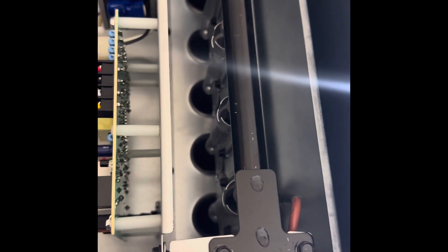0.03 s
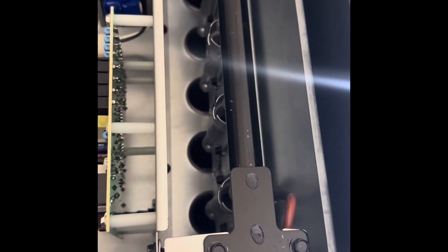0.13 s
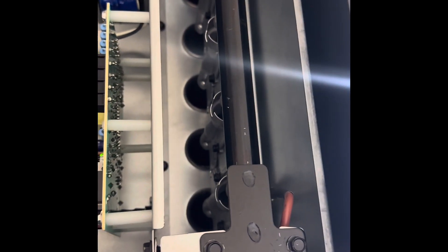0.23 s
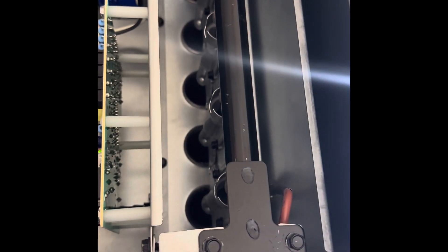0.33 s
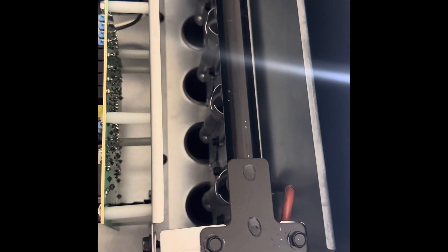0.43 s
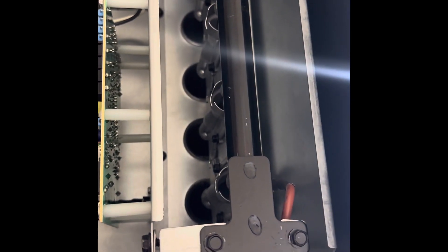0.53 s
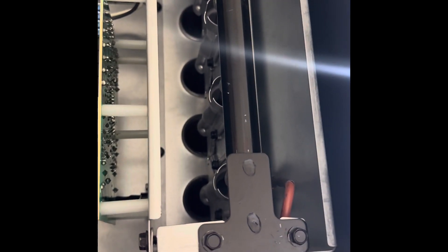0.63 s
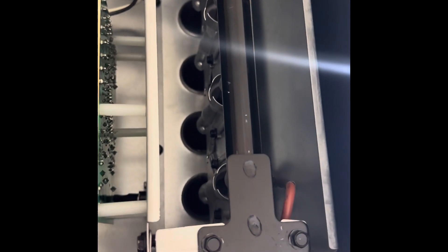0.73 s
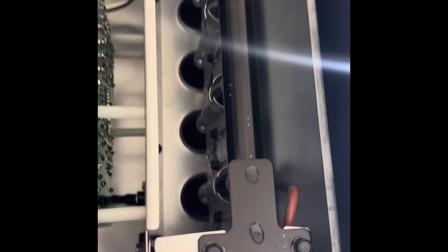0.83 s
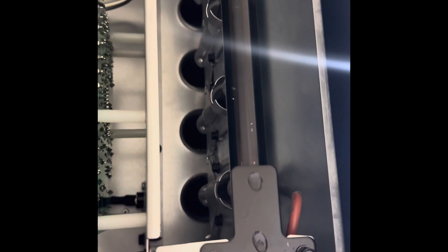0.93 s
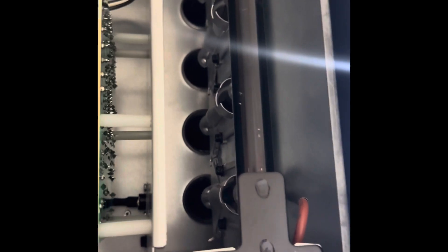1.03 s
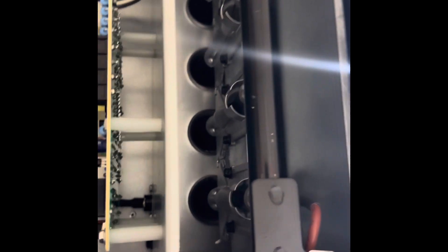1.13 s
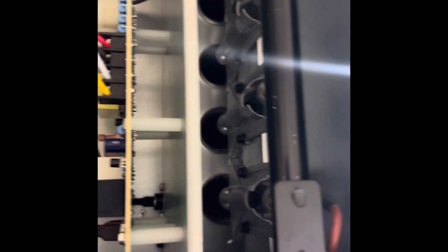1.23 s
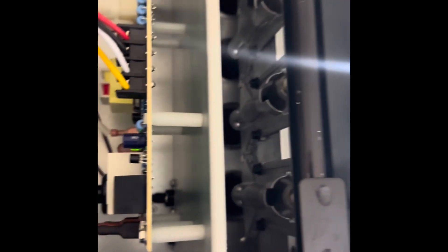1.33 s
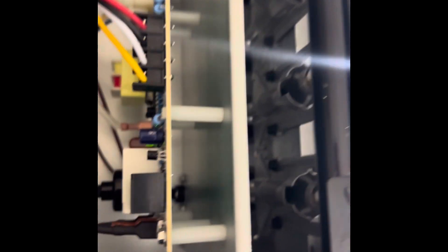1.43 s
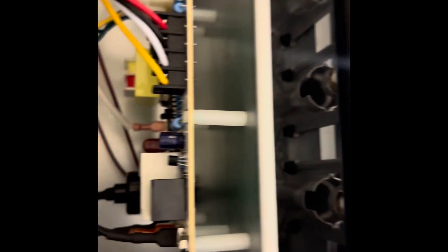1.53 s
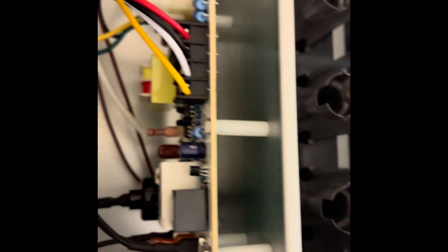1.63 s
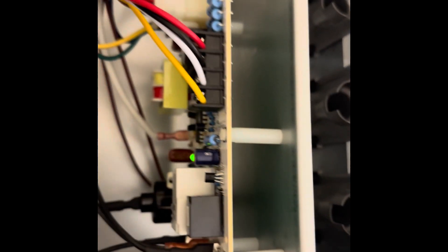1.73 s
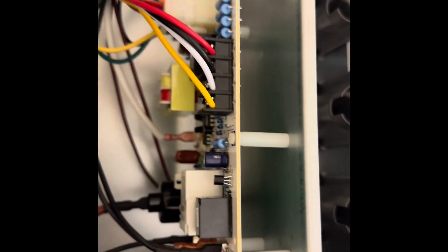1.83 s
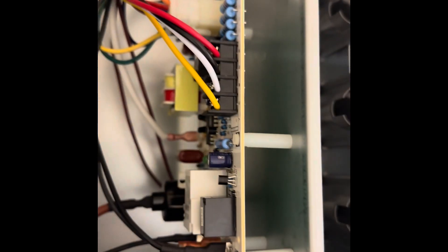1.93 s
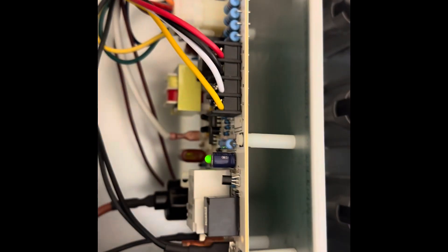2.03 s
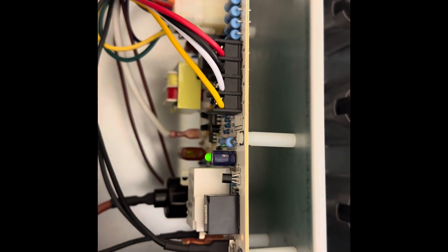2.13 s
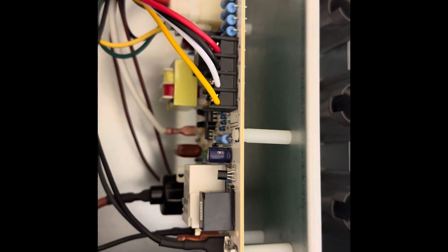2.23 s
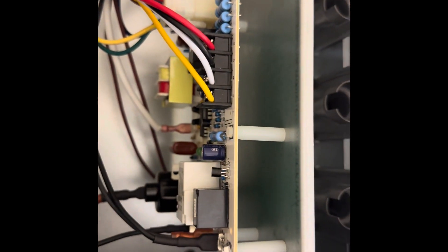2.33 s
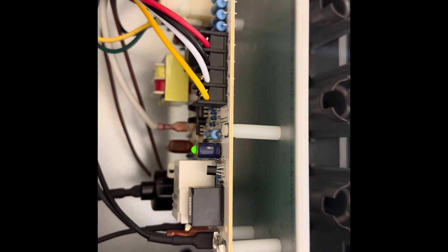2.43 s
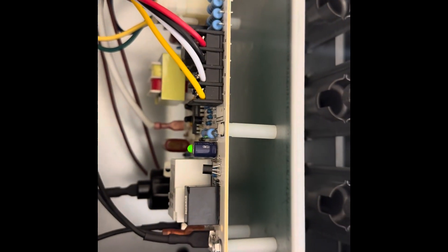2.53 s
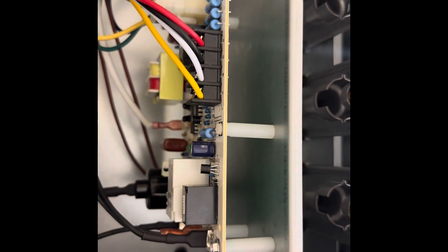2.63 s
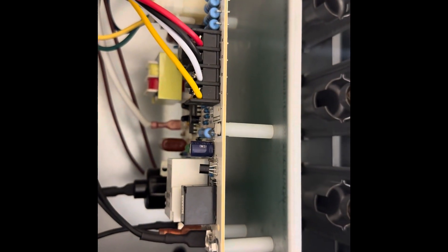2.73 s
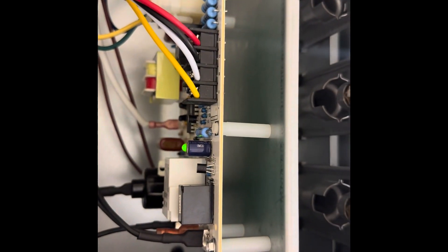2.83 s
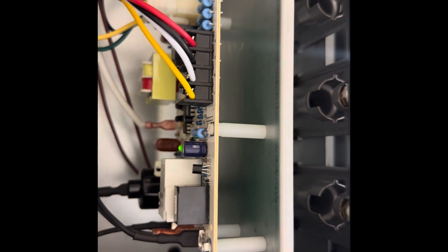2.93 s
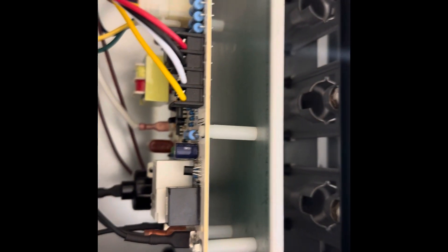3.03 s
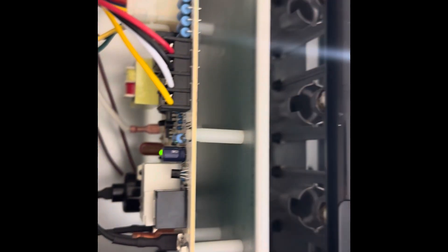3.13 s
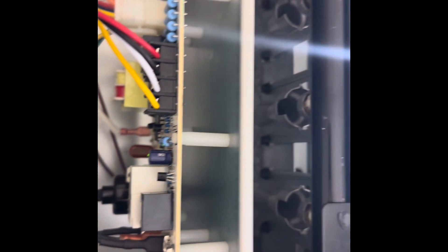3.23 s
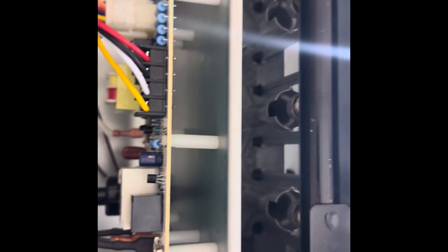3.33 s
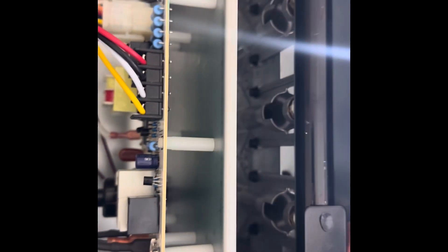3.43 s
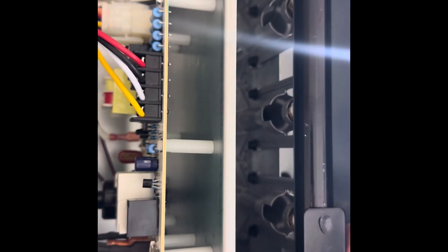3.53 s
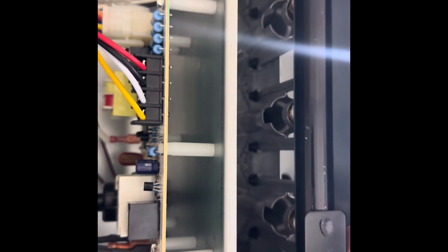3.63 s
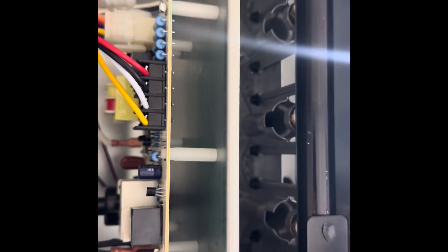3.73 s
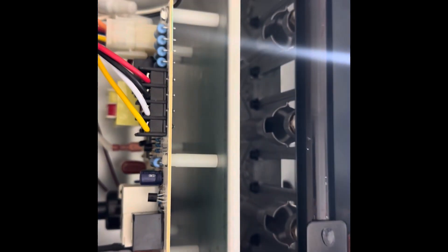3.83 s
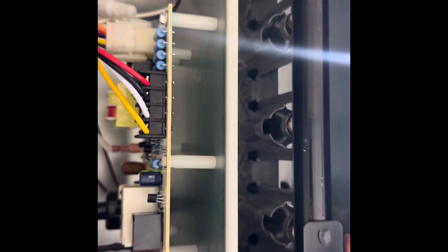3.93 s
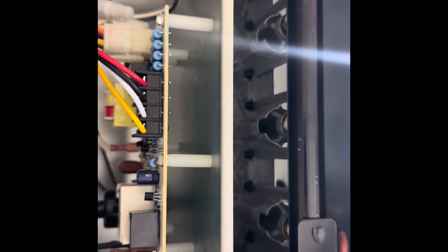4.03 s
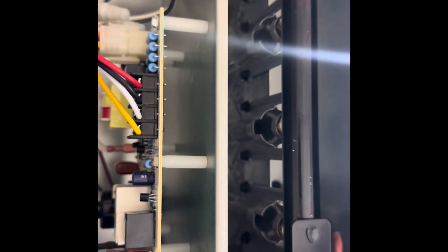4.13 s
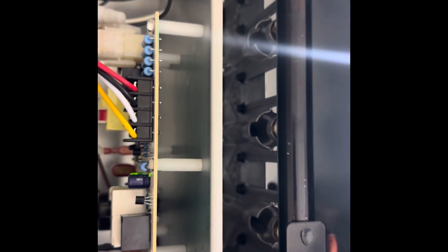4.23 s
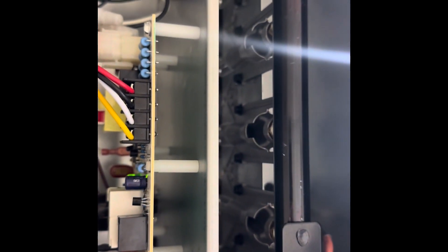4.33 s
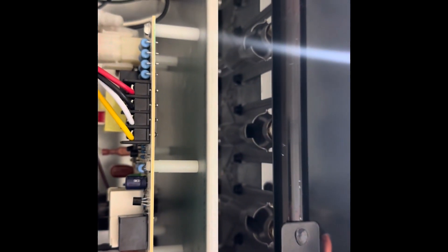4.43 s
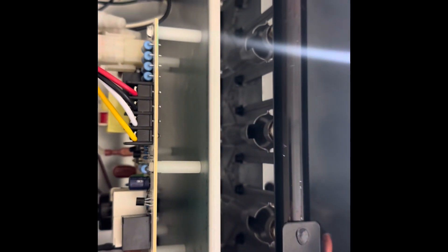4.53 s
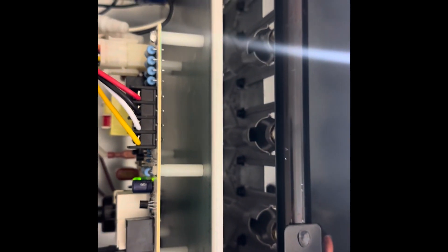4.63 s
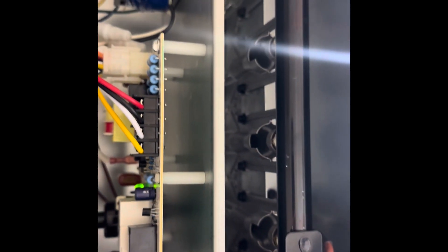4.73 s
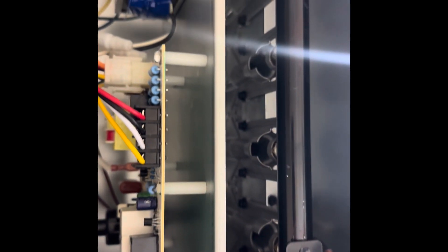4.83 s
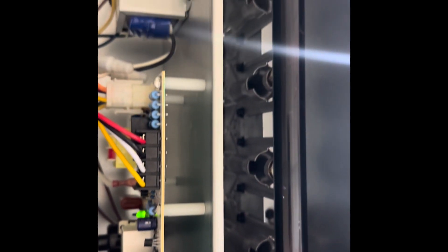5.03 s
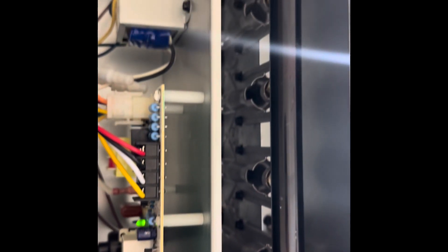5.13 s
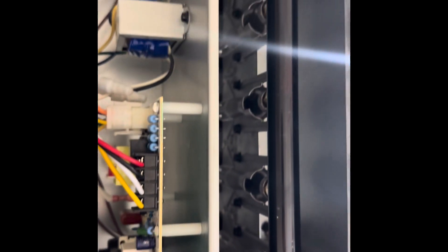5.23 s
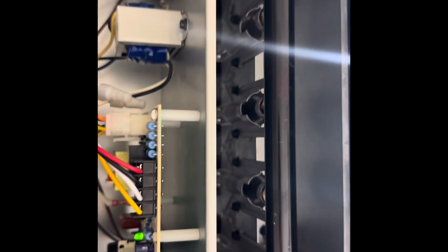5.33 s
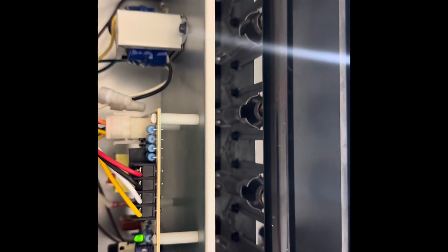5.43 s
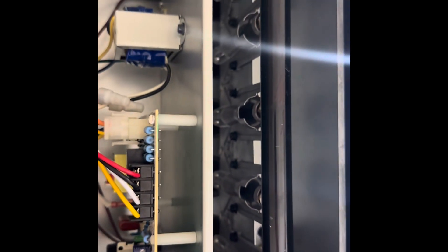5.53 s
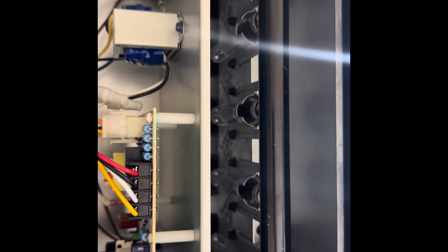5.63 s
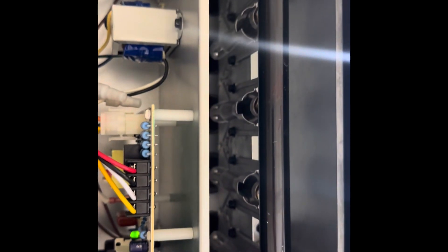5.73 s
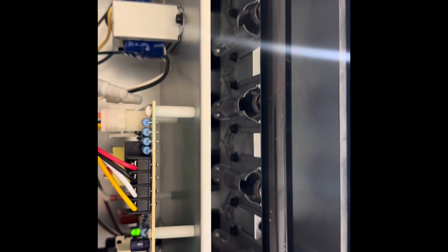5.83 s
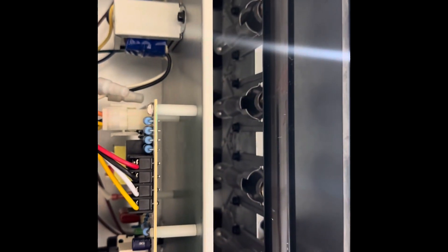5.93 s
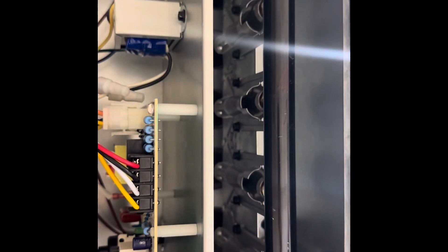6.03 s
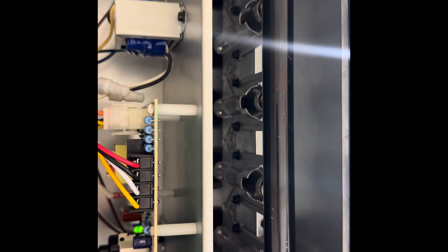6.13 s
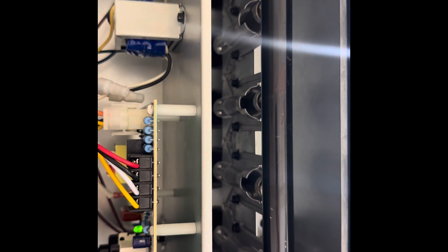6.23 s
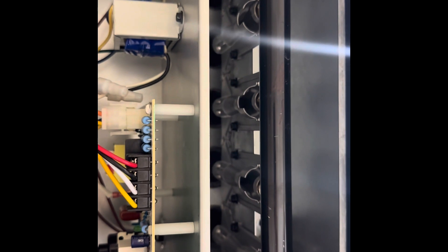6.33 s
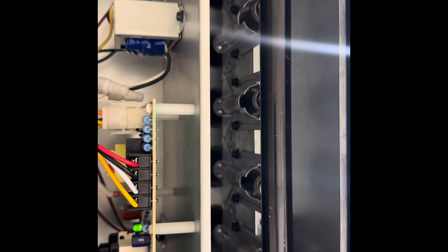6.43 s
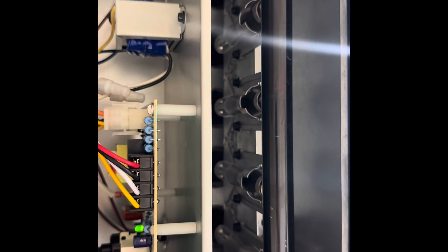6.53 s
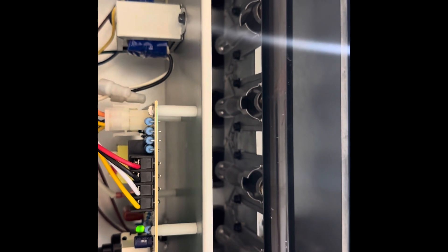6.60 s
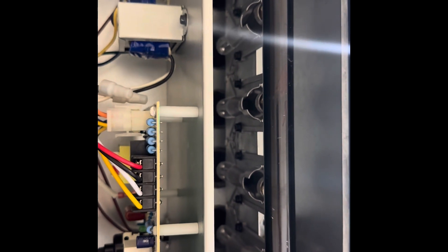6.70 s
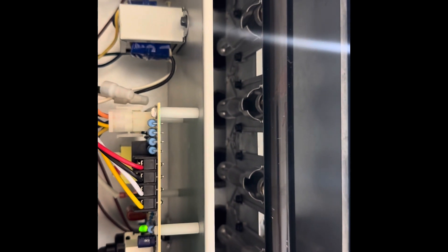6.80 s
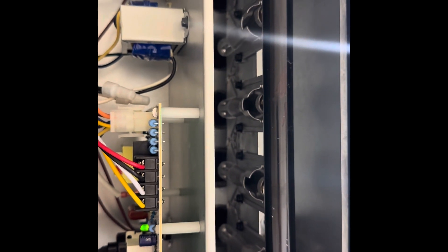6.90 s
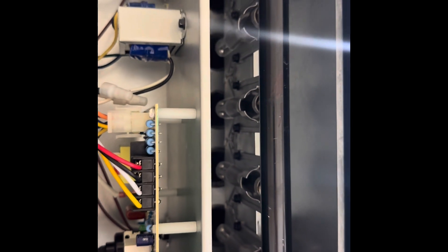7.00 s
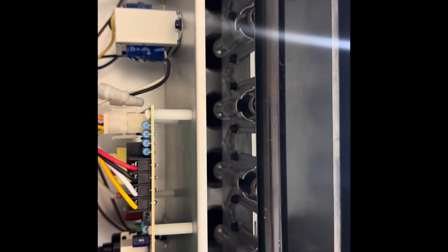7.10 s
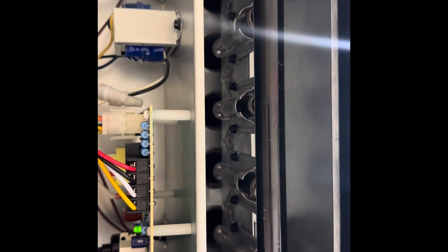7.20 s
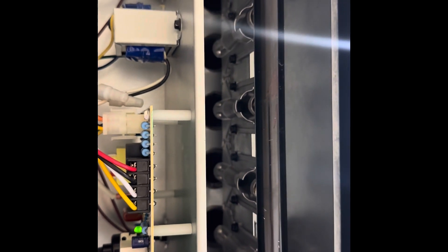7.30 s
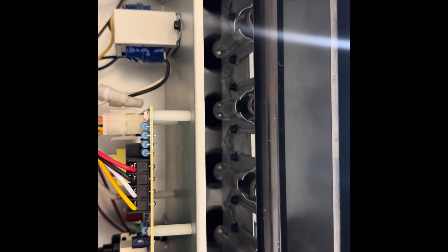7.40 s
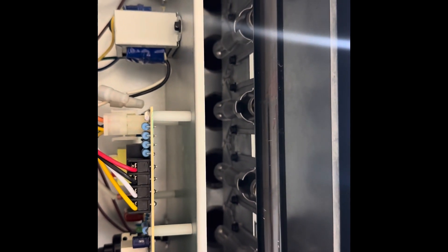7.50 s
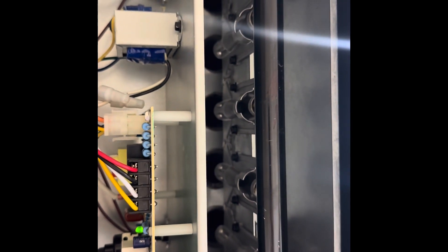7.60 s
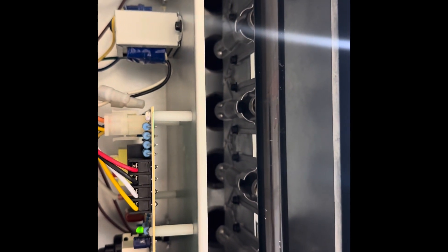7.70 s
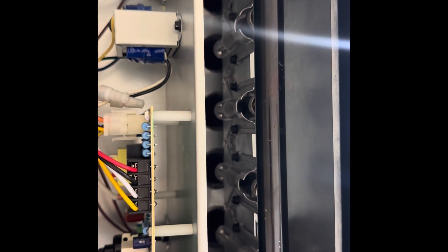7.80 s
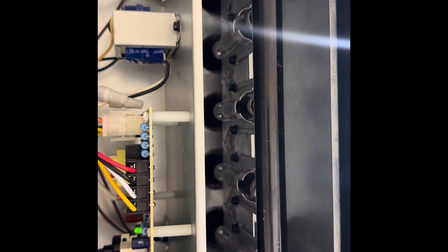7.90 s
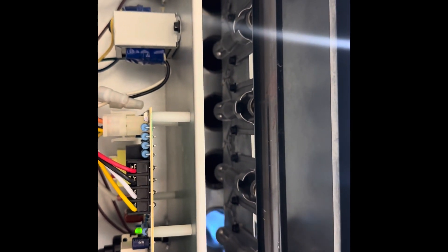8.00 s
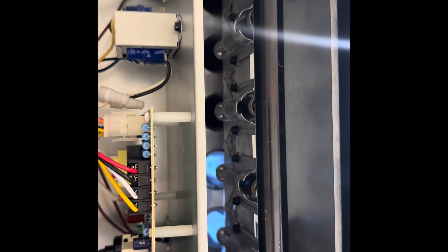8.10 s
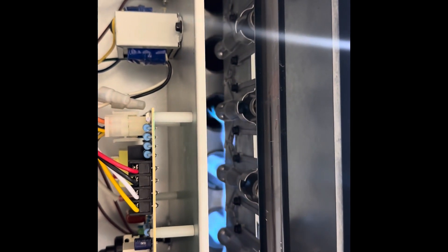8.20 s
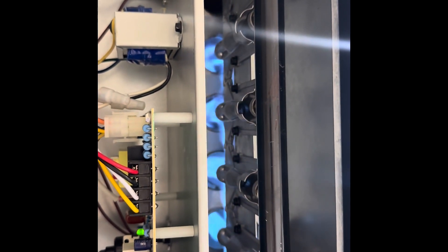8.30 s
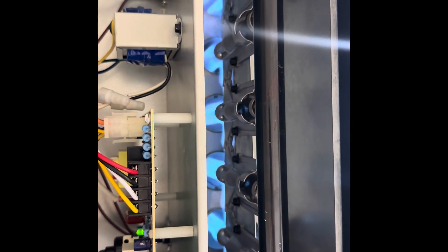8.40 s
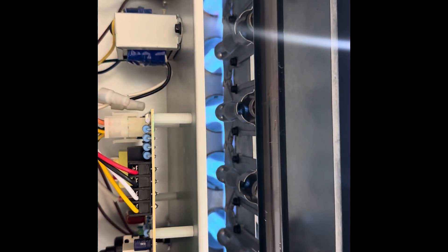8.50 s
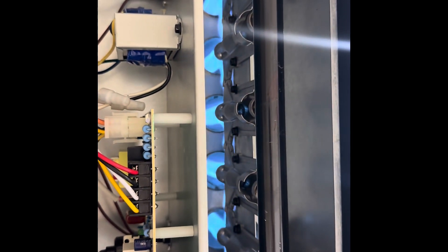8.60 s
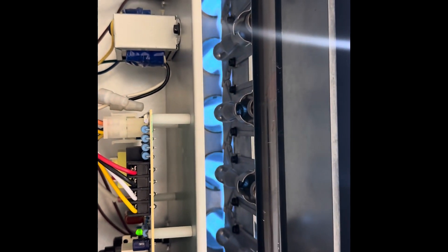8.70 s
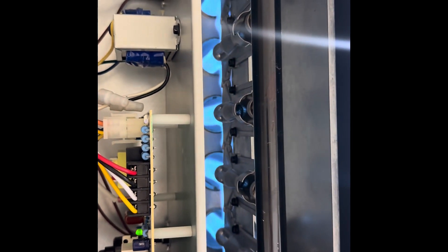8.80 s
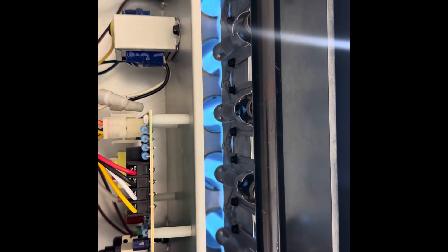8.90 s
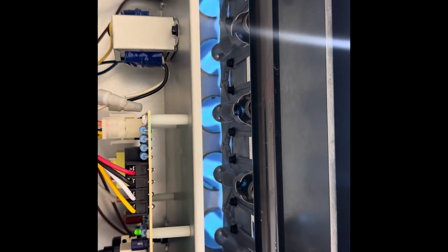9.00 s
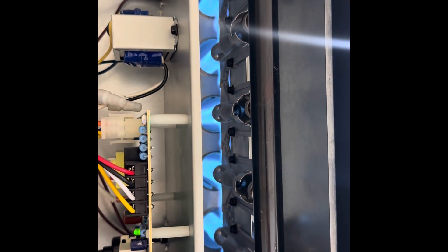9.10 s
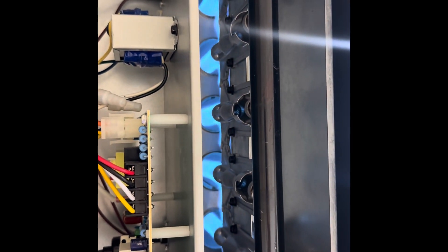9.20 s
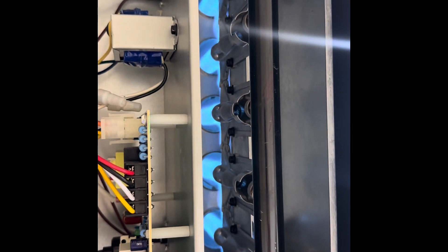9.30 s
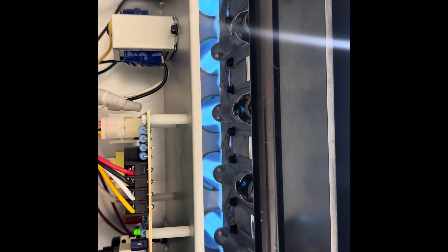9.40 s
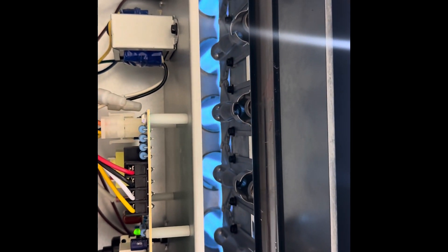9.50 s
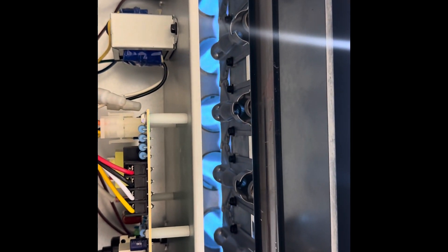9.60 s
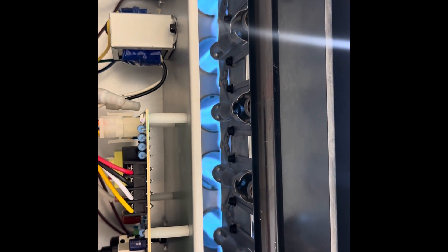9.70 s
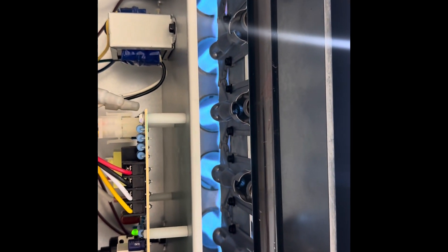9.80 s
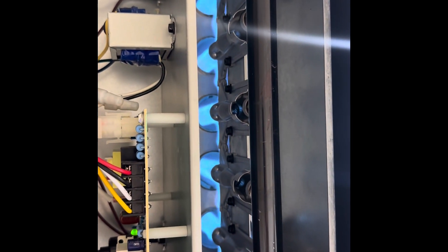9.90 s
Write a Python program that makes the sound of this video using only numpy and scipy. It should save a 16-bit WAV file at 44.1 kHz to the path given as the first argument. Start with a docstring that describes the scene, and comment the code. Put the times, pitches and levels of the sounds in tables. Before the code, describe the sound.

Very close to the open burner box of a gas unit heater, with narrow stereo width and little room sound. From 0 seconds a draught blower runs steadily: a deep electrical hum, slowly beating, with broad rushing air, a faint hollow moan and a fine high hiss. The hiss and moan shift subtly as the microphone moves along the cabinet during the first five seconds, with a thin whistle near 4. At about 6.15 the igniter starts abruptly, a harsh bright buzz of about sixty snaps per second ringing the metal box. At 7.1 the gas valve ticks and clacks in a tight metallic flurry, followed by a short low panel boom. Between about 7.95 and 8.4 burners catch one after another in soft, ragged puffs and low thumps. A low fluttering roar builds and continues to the end near 10, beneath rougher, shimmering spark buzz and the unchanged blower.

```python
"""Close by the open burner box of a gas unit heater, as it starts up.
The draught blower hums (steady tones) and rushes (coloured noise) throughout.
The igniter begins to spark once every mains cycle, each snap ringing the burner box.
The gas valve clacks open: short blows shake its body, and a cabinet panel booms.
The burners catch with soft puffs of shaped noise and low pushes, and settle into a low roar."""
import sys
import numpy as np
from scipy import signal
from scipy.fft import rfft, irfft, next_fast_len
from scipy.io import wavfile
from scipy.ndimage import uniform_filter1d, map_coordinates

SR = 44100
rng = np.random.default_rng(int(sys.argv[2]) if len(sys.argv) > 2 else 0)


def to_wav(s):
    """Save 16-bit WAV."""
    ch = np.atleast_2d(s).T  # columns
    pcm = np.round(np.clip(ch, -1, 1) * 32767)  # PCM
    wavfile.write(sys.argv[1], SR, pcm.astype(np.int16))


N = 438794
T = np.arange(N) / SR  # time of every sample, in seconds

# In all tables, spectrum levels are relative, and half-width is how far from its centre
# a resonance has dropped by 6 dB.

# Tones of the turning wheel: [multiple of shaft speed, level/dB, phase waver/turns]
WHEEL_TONES = [(1, -32, .005), (2, -41.5, 0.015), (7, -52.5, 0.052), (9, -53.5, .08), (10, -56, 0.08),
               (21, -57, 0.2), (28, -58.5, 0.13), (30, -59, 0.078)]
# Buzz of the motor frame: [multiple of mains frequency, level/dB, phase waver/turns]
FRAME_TONES = [(6, -46.5, 0.38), (8, -50.5, 0.2), (10, -51.5, 0.11), (12, -54, 0.26), (14, -53.5, 0.35),
               (21, -57, 0.17)]
# Spectrum of the rushing air: [f/Hz, level/dB]
RUSH_SPECTRUM = [(28, -20.5), (45, -8.5), (70, 7), (100, 0), (160, 2), (220, -0.5), (300, -6.5), (450, -10),
                 (800, -12.5), (1100, -13.5), (1600, -17.5), (2200, -18.5), (3000, -23), (4200, -26.5),
                 (5000, -34.5), (9000, -64)]
# Weaker air resonances of the housing and those of the tubes: [f/Hz, half-width/Hz, level/dB]
HOUSING_MODES = [(262, 16, -6.5), (479, 23, -13.5), (602, 45, -13.5), (728, 30, -16), (785, 31, -17),
                 (828, 24, -17), (959, 23, -15.5), (1070, 22, -20), (1227, 35, -23.5), (1440, 55, -21),
                 (1917, 62, -20), (2490, 43, -23.5), (2777, 210, -21.5), (3490, 126, -27),
                 (3850, 165, -26.5)]
# Main air resonance of the housing: [f/Hz, half-width/Hz, level/dB]
MOAN_MODE = [(364, 38, 0)]
# Spectrum of the hiss at the burner mouths: [f/Hz, level/dB]
HISS_SPECTRUM = [(3000, -28), (5000, -11.5), (5400, -2), (5900, -0.5), (6400, -2), (7300, 3), (8800, -5.5),
                 (9900, -10), (10500, -35), (11500, -57), (16000, -43)]
# Resonances in that hiss: [f/Hz, half-width/Hz, level/dB]
HISS_MODES = [(7080, 120, -2), (7120, 63, 2), (7760, 36, 4), (8330, 58, -1.5), (8840, 77, -0.5)]
# Thin whistle of one burner mouth: [f/Hz, half-width/Hz, level/dB]
WHISTLE_MODE = [(7340, 130, 0)]
# The microphone moves along the cabinet: [t/s, place 0-3]
MICROPHONE_PLACE = [(1.1, 0), (1.7, 1), (3.0, 1), (3.4, 2), (4.5, 2), (5.3, 3)]
# The hiss changes as the microphone nears the burner mouths: [t/s, level/dB]
HISS_LEVEL = [(0, -1), (1.0, -0.5), (1.55, 3), (2.8, 0), (4.1, 3), (5.1, 1), (6.1, 2)]
# The rush above the bass, along the microphone's way: [t/s, level/dB]
UPPER_RUSH_LEVEL = [(0, -0.5), (0.7, -0.5), (1.4, 0.5), (2.7, -0.1), (3.9, 1), (5.2, 0), (6.2, 1)]
# The moan along the microphone's way: [t/s, level/dB]
MOAN_LEVEL = [(0, 1.5), (.7, 0), (1.3, 1.5), (2.6, 2.5), (4.2, 1.2), (4.8, -1), (7.8, -0.5)]
# The valve's blows: [t/s, level/dB, weight from 0 (light tick) to 1 (heavy knock)]
VALVE_BLOWS = [(7.0904, -14, 0), (7.096, -3, 0.06), (7.0992, -3, 0.08), (7.103, -9, 0.2),
               (7.1092, -8.5, 0.23), (7.1106, -5, .1), (7.113, -3, 0.95), (7.117, -11.5, 0.9),
               (7.1207, -9, 0.5), (7.124, -8, 0.8), (7.132, -12, .9)]
# Spectrum of the light tick: [f/Hz, level/dB]
TICK_SPECTRUM = [(300, -38), (1500, -8), (3000, -9), (4800, -4.5), (6000, 9), (7000, 6.5), (8200, 8),
                 (9800, -1.5), (11500, -33), (15500, -3)]
# Spectrum of the heavy knock: [f/Hz, level/dB]
KNOCK_SPECTRUM = [(150, -12), (600, -10), (900, -3), (1250, 3), (1900, -3), (2900, -1), (4500, -8),
                  (7000, -2), (9500, -9), (12000, -27), (15500, -24)]
# Ways the valve body rings: [f/Hz, half-width/Hz, level over the blow's spectrum/dB]
VALVE_MODES = [(1320, 70, 9.5), (1450, 44, 8), (1610, 70, 3), (1920, 55, 3), (2144, 37, 9.5),
               (2400, 60, -1), (2820, 45, 4), (2990, 83, 7.5), (3330, 45, 1), (6330, 55, -1), (6960, 89, 1),
               (7750, 50, -2), (9200, 110, 2)]
# Ways the cabinet panel booms: [f/Hz, level/dB, time to die away by 60 dB/s]
PANEL_MODES = [(183, -12, 0.28), (253, -24, .12), (345, -25, 0.078)]
# Spectrum of the spark in cold air: [f/Hz, level/dB]
COLD_SPECTRUM = [(250, -25.5), (800, -7.5), (1500, -7.5), (2700, -11.5), (3800, -11.5), (4900, -8.5),
                 (5800, -8.5), (7200, -4.5), (9500, -4.5), (10400, -13), (12300, -35), (13800, -19),
                 (15600, -7.5), (16200, -38)]
# Resonances of the cold burner box: [f/Hz, half-width/Hz, level/dB]
COLD_MODES = [(2700, 60, -10), (3110, 32, -8), (3496, 51, -4), (3700, 45, -2.5), (3895, 67, -5.5),
              (4120, 40, -8), (5630, 36, -4), (5970, 67, -5), (6340, 55, -16), (6840, 66, -2),
              (7500, 84, -2.5), (7970, 55, -3), (8250, 55, -3), (8540, 48, -1.5), (8930, 136, 4.5),
              (9550, 160, -3)]
# Spectrum of the spark inside the flame: [f/Hz, level/dB]
HOT_SPECTRUM = [(250, -26.5), (800, -2.5), (1500, -4.5), (2800, -8.5), (3700, -4), (5000, -11), (6000, 1.5),
                (7200, -4.5), (9300, -2), (10400, -8), (12300, -33), (13800, -18.5), (15600, -4.5),
                (16200, -17)]
# Resonances of the burner box with flame in it: [f/Hz, half-width/Hz, level/dB]
HOT_MODES = [(2104, 46, -4.5), (2590, 200, -10.5), (3380, 48, -6.5), (3620, 90, -6.5), (4140, 320, -7.5),
             (4714, 57, -5.5), (5300, 98, -9), (5880, 140, 1.5), (6230, 55, -14), (6800, 150, -4.5),
             (7570, 180, -6), (8020, 60, -8), (8350, 78, 4), (8800, 150, -1.5), (9420, 220, 0.5),
             (10330, 120, -8.5)]
# Echoes from the walls of the burner box: [delay t/s, relative gain]
WALL_ECHOES = [(0, 0.9), (.0019, 0.35), (.0035, 0.22), (.0058, .15), (.0083, .14)]
# Time each frequency takes to leave the burner box: [f/Hz, delay t/s]
BOX_DELAY = [(1500, 0.00002), (3500, 0.00055), (5000, 0.000973), (6500, 0.00141), (7800, 0.00097),
             (9000, 0.0001)]
# Spectrum of the burning flames: [f/Hz, level/dB]
ROAR_SPECTRUM = [(20, -34), (45, 0.5), (70, 7.5), (110, 3.5), (170, 1.5), (260, -12.5), (330, -4),
                 (430, -11.5), (600, -20.5), (950, -19), (1600, -31), (4000, -53)]
# Resonances of the tubes once they hold flame: [f/Hz, half-width/Hz, level/dB]
FIRED_TUBE_MODES = [(181, 17, 0), (336, 23, 1.5), (438, 25, -13)]
# Burners catching: [t/s, puff level/dB, puff length/s, low push level/dB, push f/Hz]
BURNER_PUFFS = [(7.966, -29.5, 0.052, -45, 189), (8.093, -30, 0.027, -45, 190),
                (8.2305, -27, .012, -23, 226), (8.239, -29, 0.012, -22, 380),
                (8.267, -28.5, .012, -23, 377), (8.287, -20, 0.014, -12, 188),
                (8.305, -31, 0.0062, -22, 160), (8.3644, -23, .008, -13.5, 190),
                (8.3795, -20, 0.0085, -14, 324), (8.398, -26, .012, -30, 380)]
# Spectrum of a puff: [f/Hz, level/dB]
PUFF_SPECTRUM = [(30, -11), (80, -1), (180, 4), (400, 4.5), (620, -11), (1050, -9), (1400, -18.5),
                 (2200, -29), (5000, -50)]
# Difference between the two microphones for the blower's air:
# [f/Hz, side level/dB, share that is a plain phase lag 0-1]
AIR_SIDE = [(60, -25.5, .1), (200, -24, 0.12), (380, -18.5, .1), (560, -12, .1), (800, -8, .1),
            (1300, -19.5, 0.11), (2390, -7.5, .1), (4400, 1.5, .2), (6000, -13.5, .4), (7500, -12, 0.69),
            (11400, 17, 0.89)]
# The same for the burner box: [f/Hz, side level/dB, share that is a plain phase lag 0-1]
BOX_SIDE = [(60, -32, .1), (380, -35, .1), (700, -8, .1), (1300, -15, .1), (2400, -7, .1), (3600, -8, .1),
            (4600, 0.5, .2), (6000, -13.5, .5), (7500, -6.5, 0.81), (9340, -1, 0.91), (11000, 14, .93),
            (15500, 9, 0.73)]

MAINS_HZ, SHAFT_HZ = 59.979, 56.52
# The motor hum swells and sinks in a slow beat
HUM_DB, BEAT_DB, BEAT_S, BEAT_CREST_S = -21.5, 0.87, 2.46, 4.78
# Its first overtone blooms while the microphone passes one spot by the control board
OVERTONE_DB, BLOOM_DB, BLOOM_AT_S, BLOOM_WIDTH_S = -48, 10.5, 1.69, 0.52
# Base levels of the moving air
RUSH_DB, MOAN_DB, HISS_DB = -33, -38, -47.5
# Narrow core of the moan: pitch, its wander, base level, its flutter
HOOT_HZ, HOOT_WANDER_HZ, HOOT_DB, HOOT_FLUTTER_DB = 364, 11, -45, 3.5
# The thin whistle is loudest as the microphone passes its burner mouth
WHISTLE_DB, WHISTLE_AT_S, WHISTLE_WIDTH_S = -50, 3.94, .9
PANEL_START_S = 7.1315
# The spark starts at full strength and sags a little
SPARK_START_S, ARC_DB, ARC_SAG_DB_PER_S = 6.1506, -30.5, 0.3
# The first flame reaches the electrode and wraps it
WRAP_START_S, WRAP_S = 7.94, 0.1
# The roar builds up as the row of burners catches
FIRE_START_S, FIRE_RISE_S, FIRE_DB = 7.83, 0.66, -25.5
PUSH_S = 0.005  # length of the low push in each puff
EDGE_HZ = 16100  # top of the sound band


def amp(db):
    """Turns decibels into gain."""
    return 10 ** (np.asarray(db) / 20)


def unit(x):
    """Scales a signal to rms 1."""
    return x / np.sqrt(np.mean(x ** 2) + 1e-20)


def curve(rows, axis=1):
    """Joins one column of a table by straight lines in time."""
    rows = np.array(rows)
    return np.interp(T, rows[:, 0], rows[:, axis])


def read(rows, hz, axis=1):
    """Reads one column of a table over log frequency."""
    rows = np.array(rows)
    return np.interp(np.log(hz + 1), np.log(rows[:, 0] + 1), rows[:, axis])


def drift(rate):
    """Smooth random wander of rms 1, with `rate` random points a second."""
    knots = rng.standard_normal(2000)
    coarse = map_coordinates(knots, [T[::100] * rate], order=3, mode="wrap")
    return unit(coarse)[np.arange(N) // 100]  # each value is held for 100 samples


def causal(power):
    """The promptest response of energy 1 that has this power spectrum."""
    cepstrum = irfft(np.log(power + 1e-12) / 2)
    half = len(cepstrum) // 2
    # Folding the cepstrum forward in time gives minimum phase
    cepstrum[1:half] *= 2
    cepstrum[half + 1:] = 0
    response = irfft(np.exp(rfft(cepstrum)))
    return response / np.linalg.norm(response)


def body(spectrum=None, modes=(), ring_db=0, size=4096):
    """Response of a broad spectrum with resonances standing on it."""
    hz = np.fft.rfftfreq(size, 1 / SR)
    power = amp(read(spectrum, hz)) ** 2 if spectrum else 0
    for f, width, db in modes:
        power = power + amp(db + ring_db) ** 2 / (1 + ((hz - f) / width) ** 2) ** 2
    return causal(power)


def through(x, response):
    """Passes a sound through a response (convolution), giving rows of N samples."""
    return signal.oaconvolve(np.atleast_2d(x), np.atleast_2d(response), axes=1)[:, :N]


def turbulence(response):
    """Two unrelated noises of rms 1, coloured by a response."""
    noise = rng.standard_normal((2, N + len(response) - 1))
    return signal.oaconvolve(noise, response[None], "valid", axes=1)


def scatter(t60, size=8192):
    """Two tails of dense reflections, each of energy 1, fading by 60 dB in t60 seconds."""
    tail = rng.standard_normal((2, size)) * amp(-60 * np.arange(size) / SR / t60)
    return tail / np.linalg.norm(tail, axis=1, keepdims=True)


def uncoloured(response, size=9):
    """Takes the tint out of a cluster of echoes, leaving its spread in time; energy 1."""
    even = []
    for row in response:
        tint = uniform_filter1d(abs(rfft(row)) ** 2, size)
        even.append(signal.oaconvolve(row, causal(1 / tint))[:len(row)])
    even = np.array(even)
    return even / np.linalg.norm(even, axis=1, keepdims=True)


def add(mix, s, sound):
    """Lays a sound into the mix at time s."""
    part = mix[:, round(s * SR):][:, :sound.shape[1]]
    part += sound[:, :part.shape[1]]


def tone(hz, db, waver):
    """A steady tone whose phase wanders a little; the first spark's time is its phase zero."""
    turns = hz * (T - SPARK_START_S) + waver * drift(9)
    return -np.sqrt(2) * amp(db) * np.sin(2 * np.pi * turns)


def motor():
    """Magnetic hum and frame buzz at multiples of the mains, wheel tones at multiples of the shaft."""
    beat = np.cos(2 * np.pi * (T - BEAT_CREST_S) / BEAT_S)
    bloom = np.exp(-abs((T - BLOOM_AT_S) / BLOOM_WIDTH_S) ** 3)
    hum = tone(2 * MAINS_HZ, HUM_DB + BEAT_DB * beat, 0.0082)
    overtone = tone(4 * MAINS_HZ, OVERTONE_DB + BLOOM_DB * bloom, 0.06)
    buzz = sum(tone(k * MAINS_HZ, db, waver) for k, db, waver in FRAME_TONES)
    wheel = sum(tone(k * SHAFT_HZ, db, waver) for k, db, waver in WHEEL_TONES)
    return hum + overtone + buzz + wheel


def hoot():
    """The core of the moan: a narrow tone that wanders in pitch and comes and goes."""
    turns = np.cumsum(HOOT_HZ + HOOT_WANDER_HZ * drift(9)) / SR
    level_db = HOOT_DB + curve(MOAN_LEVEL) + HOOT_FLUTTER_DB * drift(6)
    return np.sqrt(2) * amp(level_db) * np.sin(2 * np.pi * turns)


def comb_echoes(air):
    """The tubes comb the air's treble; each microphone place has its own set of echoes."""
    treble = signal.lfilter(*signal.butter(2, 2500, "high", fs=SR), air)
    echoes = 0
    for place in range(4):
        near = np.maximum(1 - abs(curve(MICROPHONE_PLACE) - place), 0)
        echoes = echoes + np.sqrt(near) * through(treble, scatter(0.1))
    return echoes


def draught(housing_db=4, slots_db=2, gust_db=0.69, tube_db=-9):
    """Air rushes and moans in the blower housing, and hisses and whistles at the burner mouths."""
    flow_db = gust_db * drift(14)
    rush = turbulence(body(RUSH_SPECTRUM, HOUSING_MODES, housing_db)) * amp(RUSH_DB + flow_db)
    moan = turbulence(body(modes=MOAN_MODE)) * amp(MOAN_DB + curve(MOAN_LEVEL) + flow_db)
    moan[0] += hoot()
    above_bass = signal.butter(2, 450, "high", fs=SR, output="sos")
    upper = signal.sosfiltfilt(above_bass, rush)
    rush = rush + upper * (amp(curve(UPPER_RUSH_LEVEL)) - 1)
    passing = np.exp(-((T - WHISTLE_AT_S) / WHISTLE_WIDTH_S) ** 2)
    whistle = turbulence(body(modes=WHISTLE_MODE)) * amp(WHISTLE_DB) * passing
    hiss_db = HISS_DB + curve(HISS_LEVEL) + .5 * drift(15)
    hiss = turbulence(body(HISS_SPECTRUM, HISS_MODES, slots_db)) * amp(hiss_db)
    air = rush + hiss
    return air + amp(tube_db) * comb_echoes(air) + moan + whistle


def valve(clack_db=11.0, room_db=-18):
    """The solenoids tick and slam home, ringing the valve body; the cabinet panel booms after them."""
    out = np.zeros((2, N))
    tick, knock = (body(blow, [(f, width, db + read(blow, f)) for f, width, db in VALVE_MODES])
                   for blow in (TICK_SPECTRUM, KNOCK_SPECTRUM))
    for s, db, weight in VALVE_BLOWS:
        rattle = uncoloured(scatter(.028), size=25) + amp(room_db) * scatter(.25)
        blow = np.sqrt(1 - weight) * tick + np.sqrt(weight) * knock
        add(out, s, amp(db + clack_db) * through(rattle, blow))
    t = np.maximum(T - PANEL_START_S, 0)
    onset = 1 - np.exp(-t / 0.004)
    for hz, db, t60 in PANEL_MODES:
        out[0] += amp(db - 60 * t / t60) * onset * np.sin(2 * np.pi * hz * t)
    return out


def dispersed(response):
    """Delays each frequency by its travel time out of the burner box."""
    hz = np.fft.rfftfreq(len(response), 1 / SR)
    turns = np.cumsum(read(BOX_DELAY, hz)) * hz[1]  # delay summed over frequency is phase
    return irfft(rfft(response) * np.exp(-2j * np.pi * turns))[:len(response) // 2]


def spark_box(colour, leak_db=-4, ring_db=4, tail_db=0):
    """One snap: a sharp crack leaks straight out; the rest leaves by the box, echoing and ringing."""
    ring = amp(ring_db) * scatter(0.024) + amp(tail_db) * scatter(0.049)  # brief ring, longer tail
    response = signal.lfilter(*signal.butter(1, [2000, 8000], "band", fs=SR), ring)
    for delay, gain in WALL_ECHOES:
        response[0, round(delay * SR)] += gain
    response = np.array([dispersed(row) for row in response])
    response[0, 0] += amp(leak_db)
    return through(uncoloured(response), colour)


def sparks(snaps, colour, box, wander, blur_t60=0.018, count=5):
    """Every snap rings the same box, plus a changing blend of paths as the arc wanders."""
    out = through(snaps, box)
    blend = rng.standard_normal((count, N))
    for share in blend / np.linalg.norm(blend, axis=0):  # the blend keeps an even strength
        out += through(snaps * share * wander, through(scatter(blur_t60), colour))
    return out


def heated(x, cool_share=.015, warm_s=.4, shimmer=.006):
    """Sound speeds up as the box heats: the snaps' ring rises in pitch and shimmers with the flames."""
    warming = np.exp(-np.maximum(T - WRAP_START_S, 0) / warm_s)
    speed = shimmer * drift(12) - cool_share * warming  # fractional change
    age = (T - SPARK_START_S + .001) % (1 / MAINS_HZ)  # time within the present spark cycle
    return np.array([map_coordinates(row, [(T + age * speed) * SR], order=5) for row in x])


def igniter(jitter_s=.00014, uneven_db=.25, flame_uneven_db=0.9, hot_db=-0.15):
    """One spark each mains cycle; it changes colour and grows uneven once flame surrounds it."""
    times = np.arange(SPARK_START_S, T[-1] - .002, 1 / MAINS_HZ)
    late, strength = rng.standard_normal((len(times), 2)).T
    at = np.round((times + jitter_s * late) * SR).astype(int).clip(0, N - 1)
    wrap = ((T - WRAP_START_S) / WRAP_S).clip(0, 1)
    arc_db = ARC_DB - ARC_SAG_DB_PER_S * (times - SPARK_START_S)
    spread_db = uneven_db + flame_uneven_db * wrap[at]
    snaps = np.zeros(N)
    # The last factor makes the arc level an rms over the whole cycle
    snaps[at] = amp(arc_db + spread_db * strength) * np.sqrt(SR / MAINS_HZ)
    cold = body(COLD_SPECTRUM, COLD_MODES, ring_db=6)
    hot = body(HOT_SPECTRUM, HOT_MODES, ring_db=6.5)
    cold_box = spark_box(cold)
    hot_box = spark_box(hot, leak_db=-6, ring_db=0, tail_db=-4)
    in_air = sparks(snaps * np.sqrt(1 - wrap), dispersed(cold), cold_box, wander=.4)
    in_flame = sparks(snaps * np.sqrt(wrap), dispersed(hot), hot_box, wander=.52)
    return in_air + amp(hot_db) * heated(in_flame)


def burners(flutter_db=1, tearing_db=2):
    """Pockets of gas catch with a low push and a ragged puff; the flames build up, flutter and roar."""
    alight = 1 - np.exp(-np.maximum(T - FIRE_START_S, 0) / FIRE_RISE_S)
    flames = turbulence(body(ROAR_SPECTRUM, FIRED_TUBE_MODES))
    out = flames * alight * amp(FIRE_DB + flutter_db * drift(22))
    puffs = np.zeros(N)
    for s, db, length, push_db, push_hz in BURNER_PUFFS:
        t = T - s
        puffs += amp(db) * np.exp(-(t / length) ** 2)
        out[0] += amp(push_db) * np.exp(-(t / PUSH_S) ** 2) * np.sin(2 * np.pi * push_hz * t)
    return out + turbulence(body(PUFF_SPECTRUM)) * puffs * amp(tearing_db * drift(160))


def microphones(sound, ports):
    """Row 0 reaches both microphones; they differ by a phase lag and by scattered sound, row 1."""
    size = next_fast_len(N + 2000)
    common, scattered = rfft(sound, size)
    hz = np.fft.rfftfreq(size, 1 / SR)
    lag = read(ports, hz, axis=2).clip(0, 1)
    side = amp(read(ports, hz)) * (-1j * lag * common + np.sqrt(1 - lag ** 2) * scattered)
    return irfft(np.array([common + side, common - side]), size)[:, :N]


def scene(lean_db=0.38):
    """Everything in the cabinet, with the motor a little to the left."""
    blower = microphones(draught(), AIR_SIDE) + motor() * amp([[lean_db], [-lean_db]])
    return blower + microphones(igniter() + valve() + burners(), BOX_SIDE)


def record(dry):
    """Rounds off the highest peaks smoothly, then limits the band."""
    knee, room = .55, .3  # level where rounding starts, and the most that can rise above it
    held = np.clip(dry, -knee, knee)
    rounded = held + room * np.tanh((dry - held) / room)
    lowpass = signal.firwin(255, EDGE_HZ, window=("kaiser", 8), fs=SR)
    return signal.oaconvolve(rounded, lowpass[None], "same")


dry = scene()
out = record(dry)
to_wav(out)
```